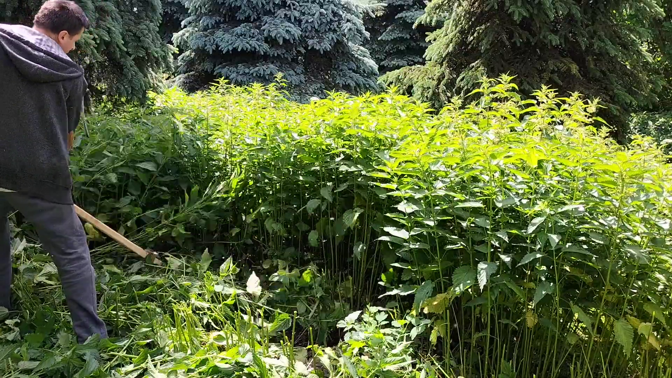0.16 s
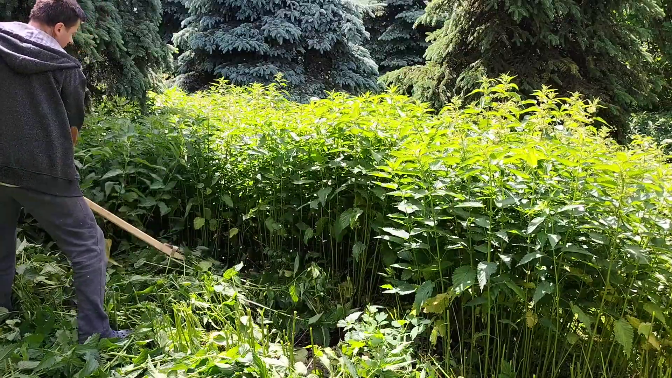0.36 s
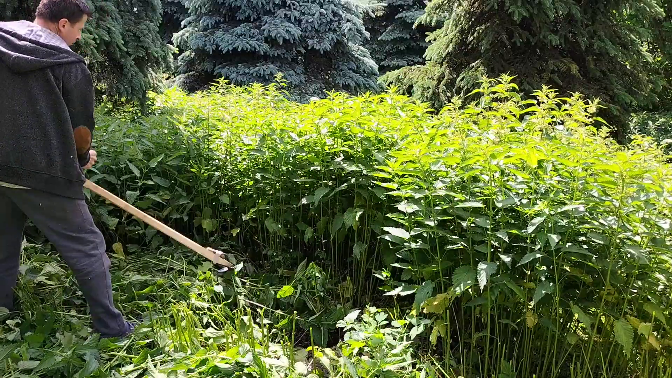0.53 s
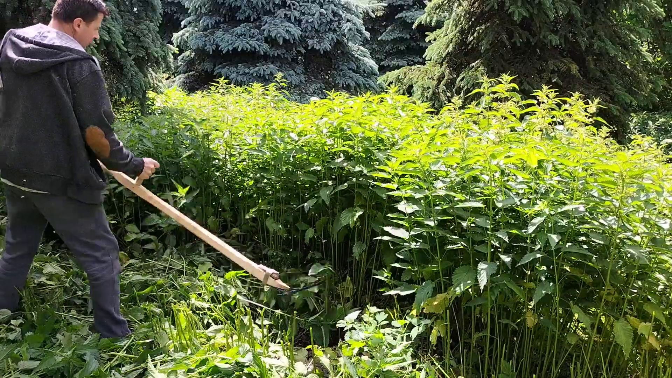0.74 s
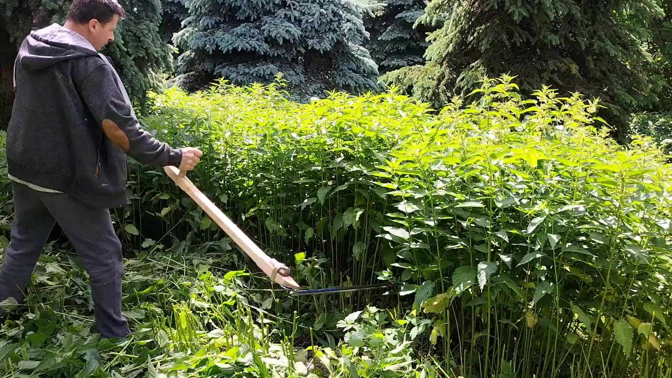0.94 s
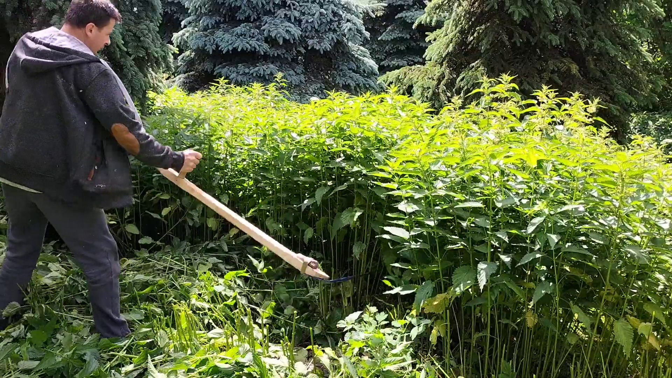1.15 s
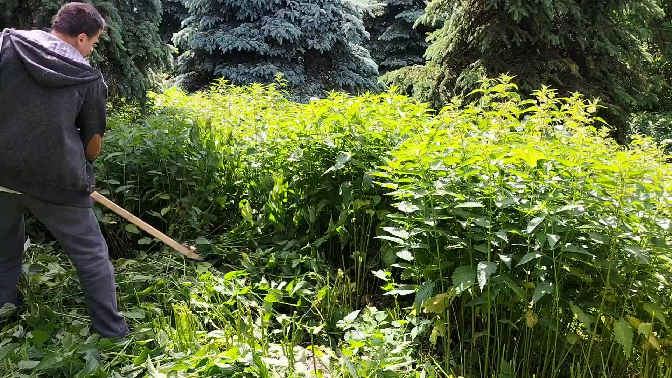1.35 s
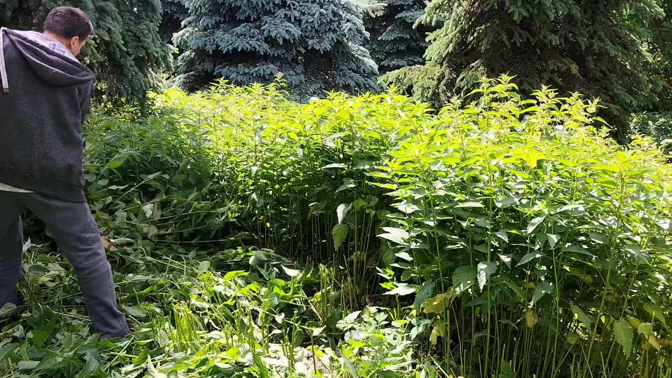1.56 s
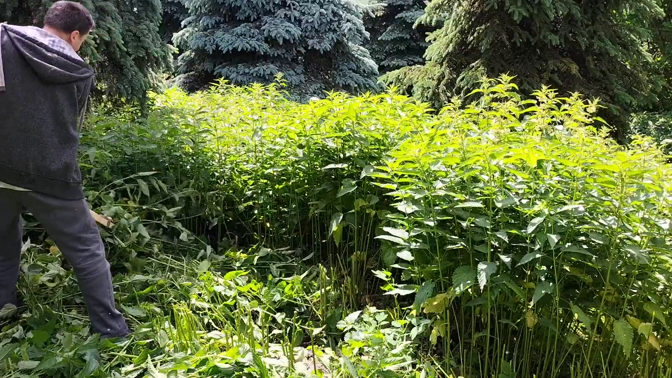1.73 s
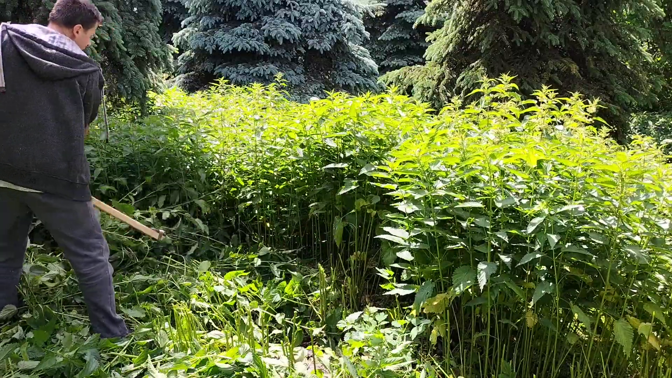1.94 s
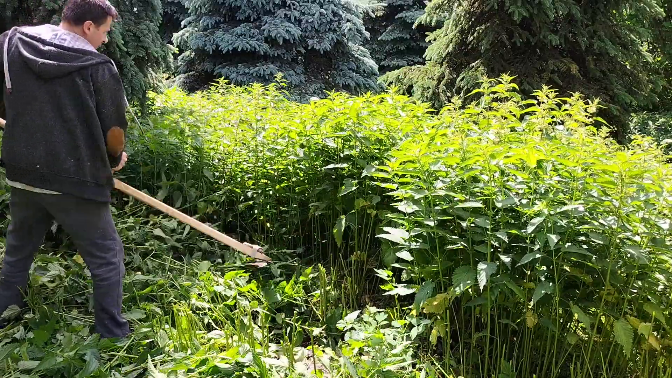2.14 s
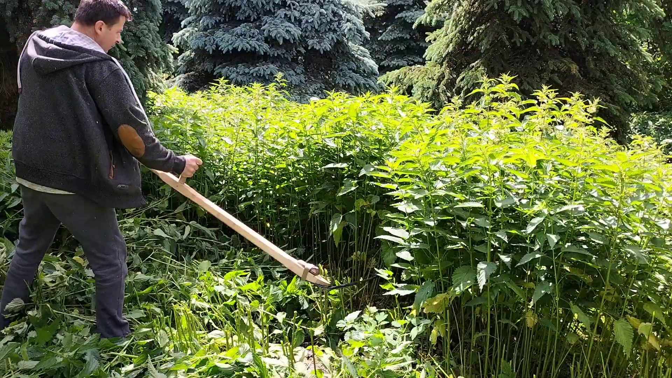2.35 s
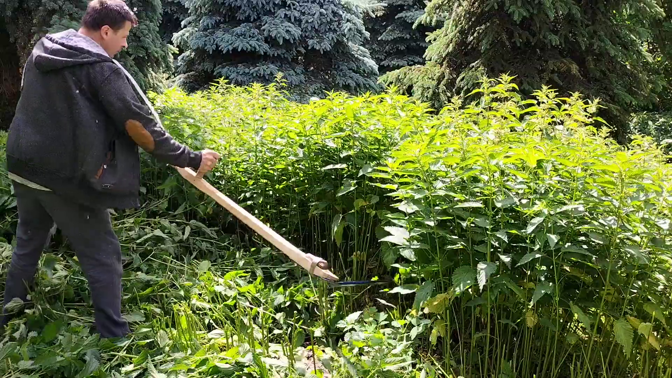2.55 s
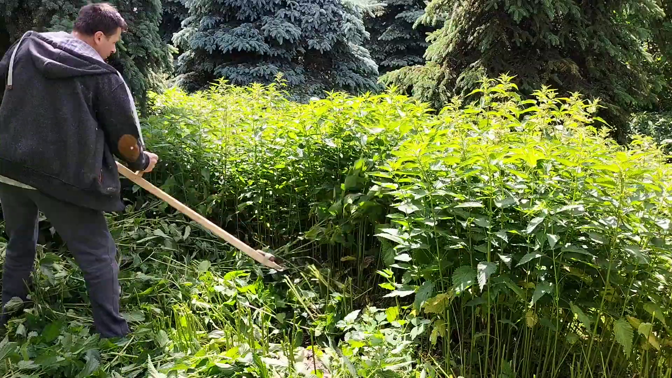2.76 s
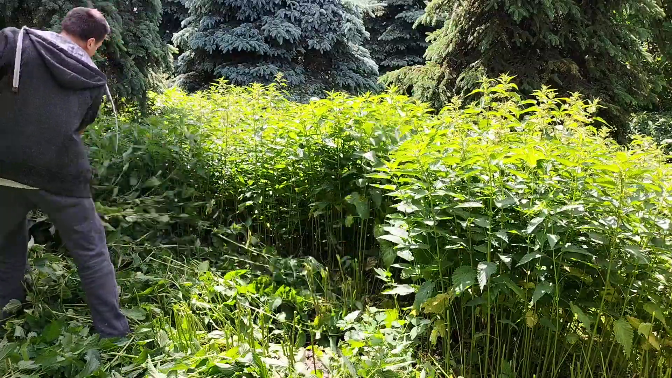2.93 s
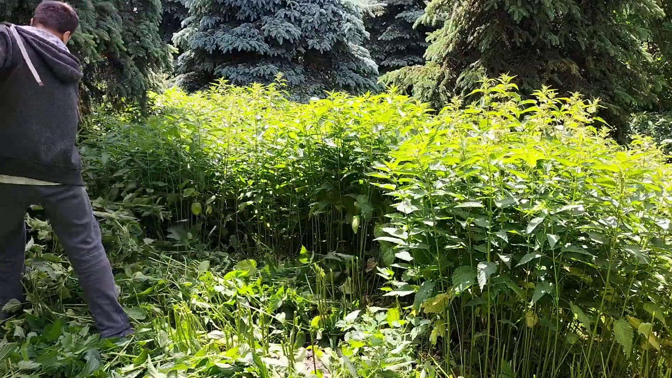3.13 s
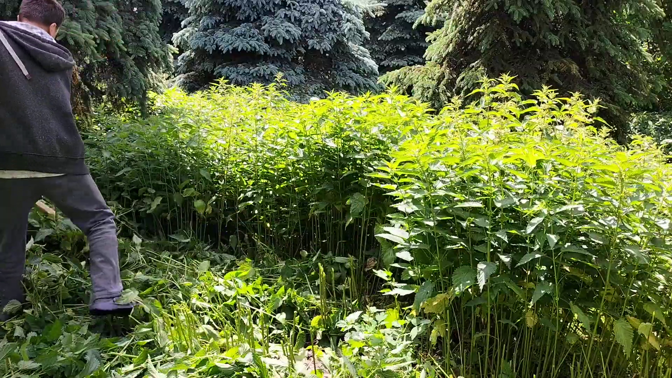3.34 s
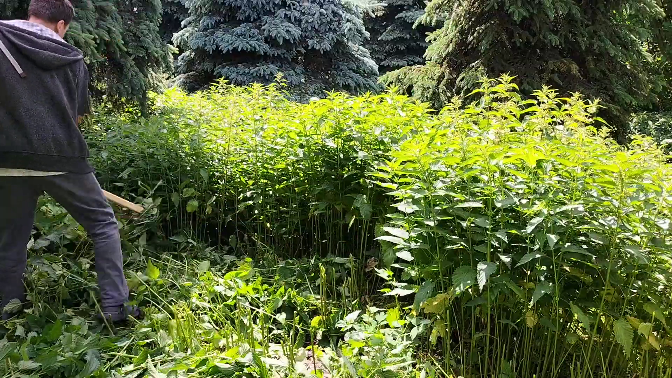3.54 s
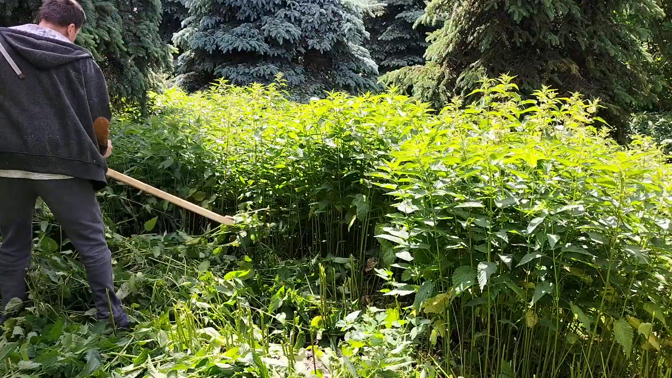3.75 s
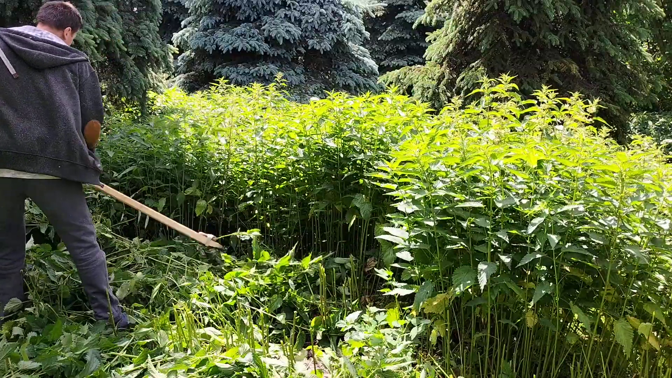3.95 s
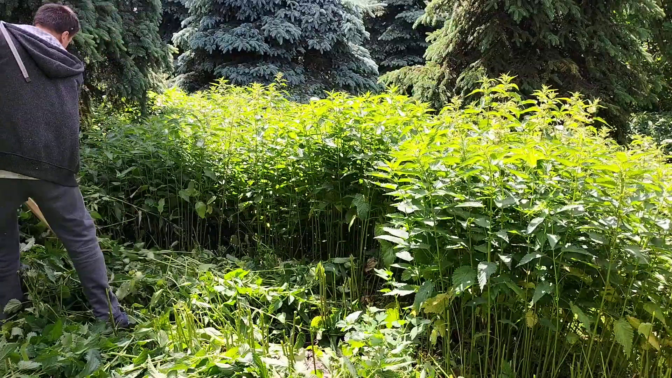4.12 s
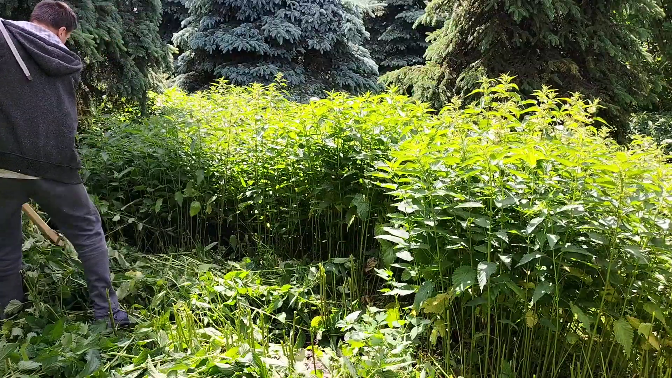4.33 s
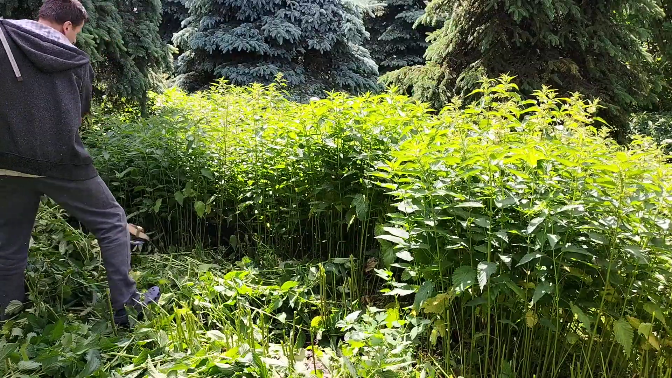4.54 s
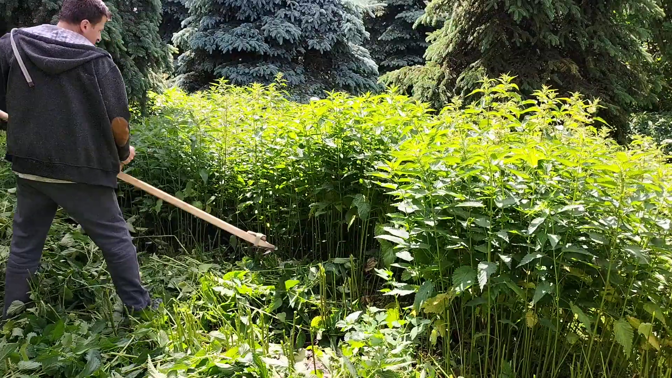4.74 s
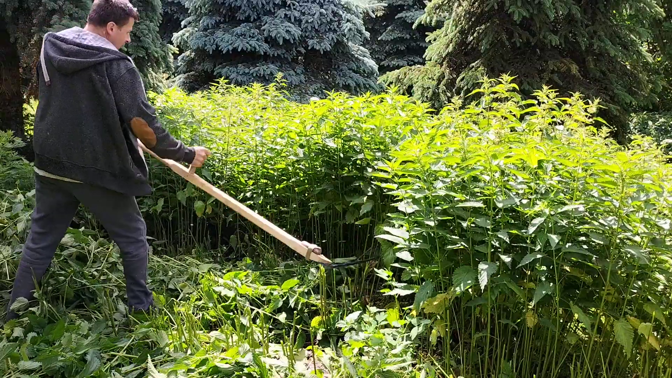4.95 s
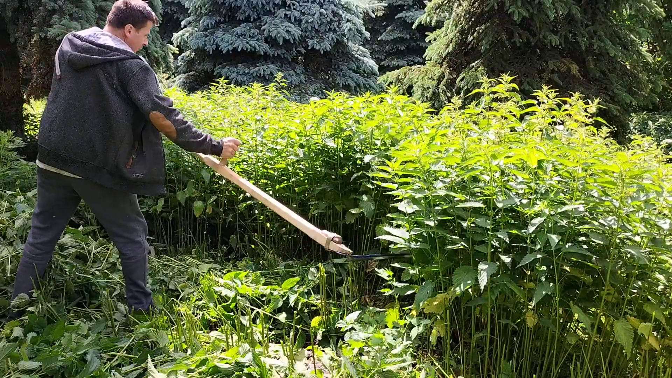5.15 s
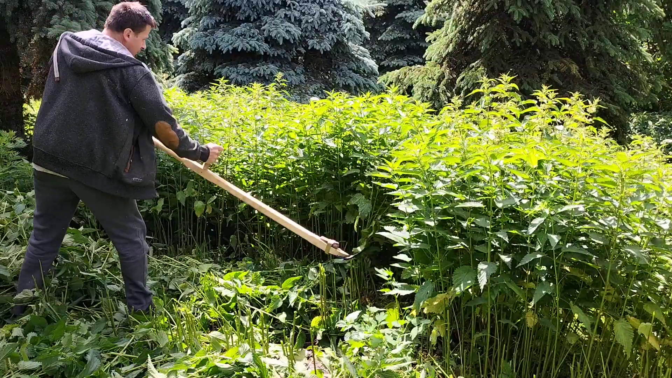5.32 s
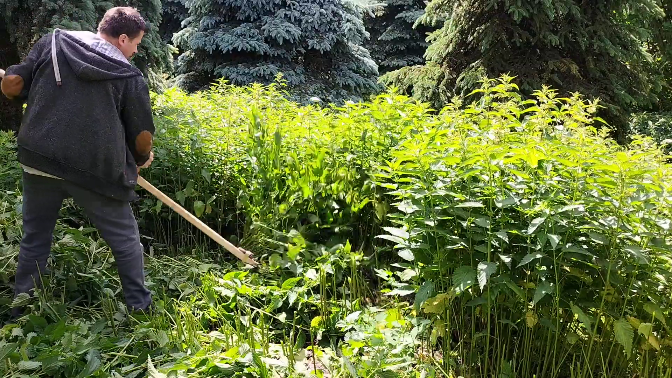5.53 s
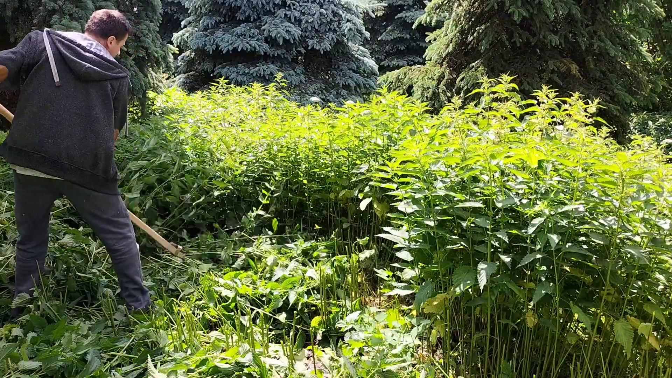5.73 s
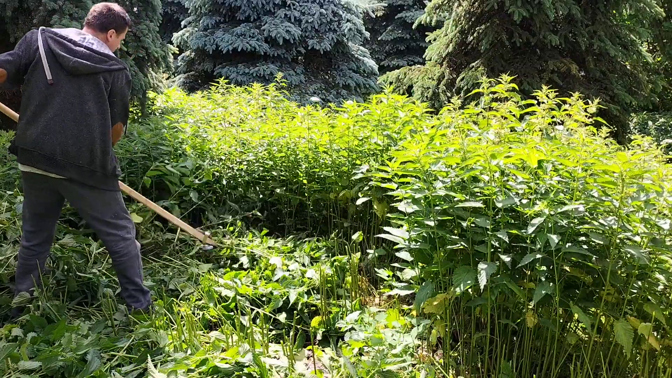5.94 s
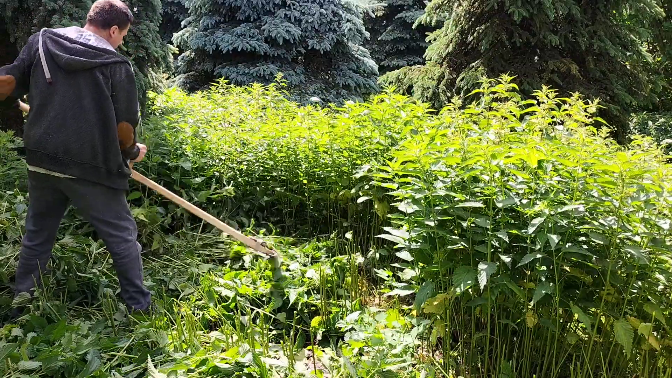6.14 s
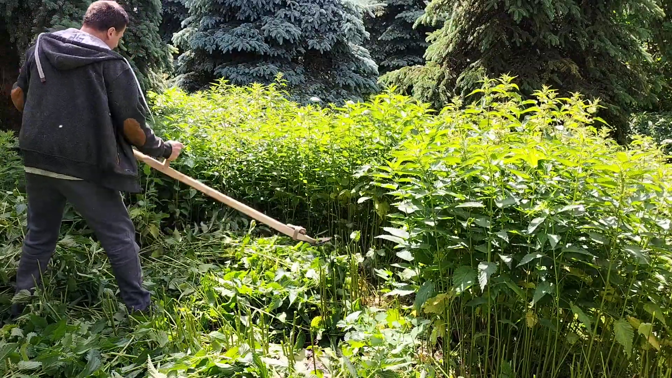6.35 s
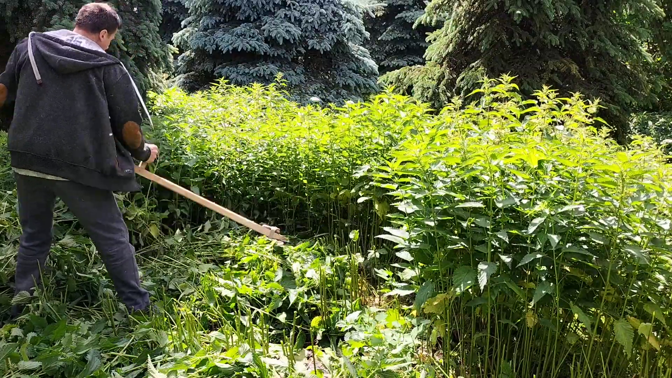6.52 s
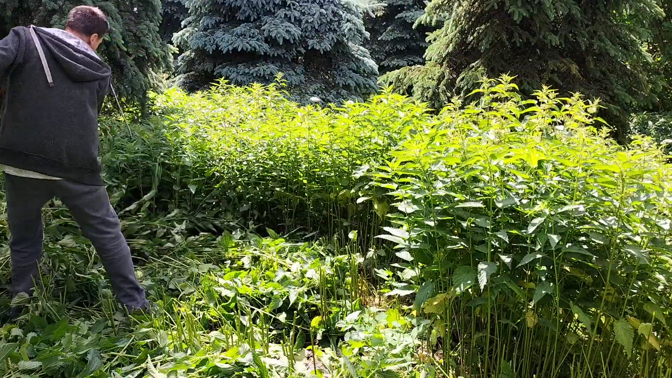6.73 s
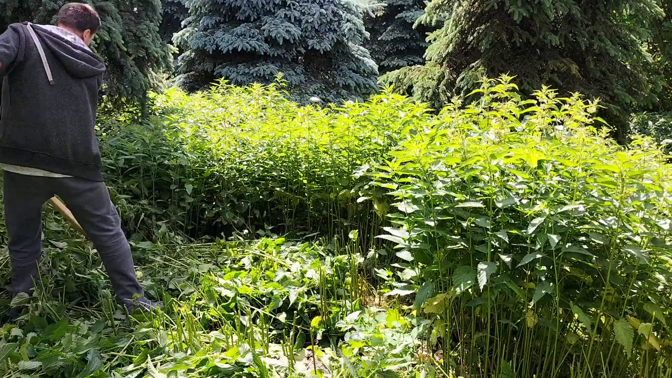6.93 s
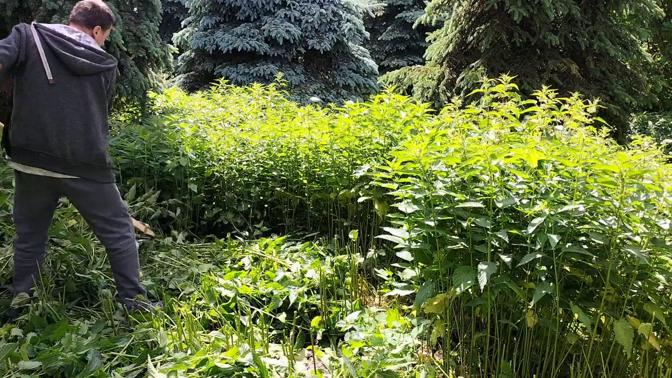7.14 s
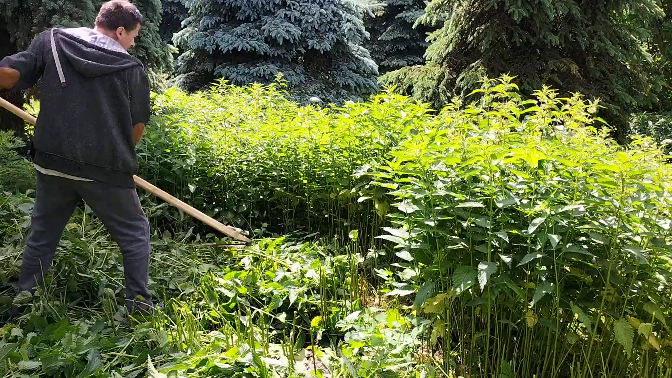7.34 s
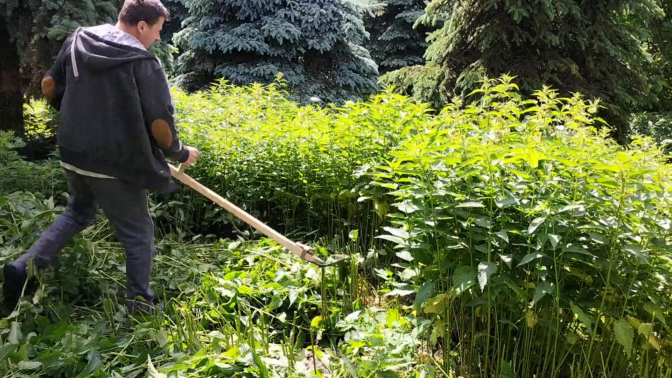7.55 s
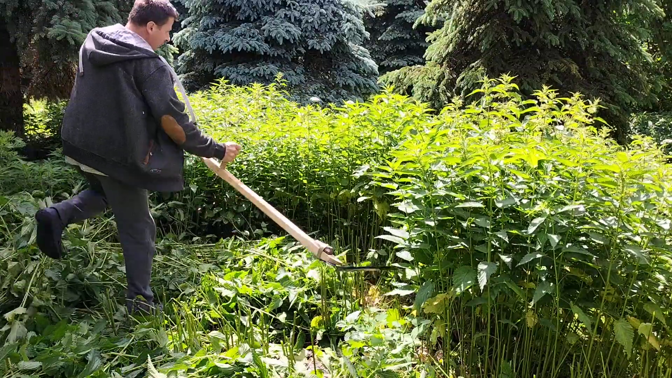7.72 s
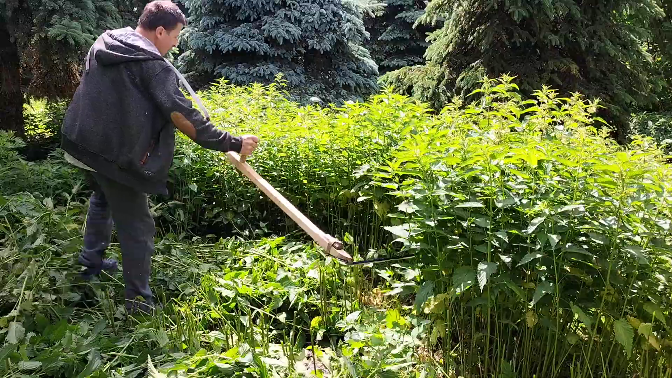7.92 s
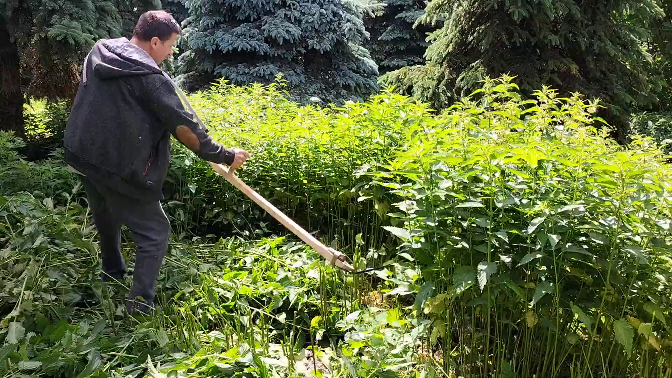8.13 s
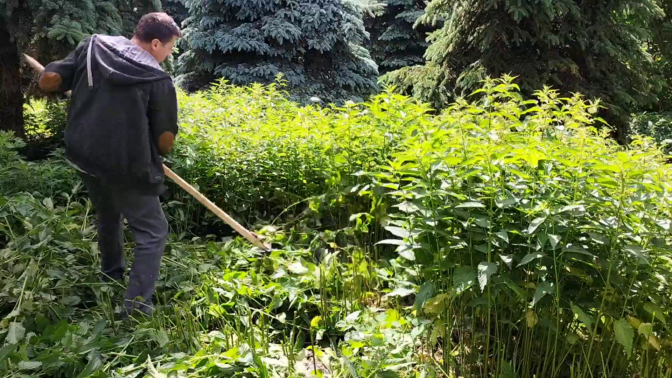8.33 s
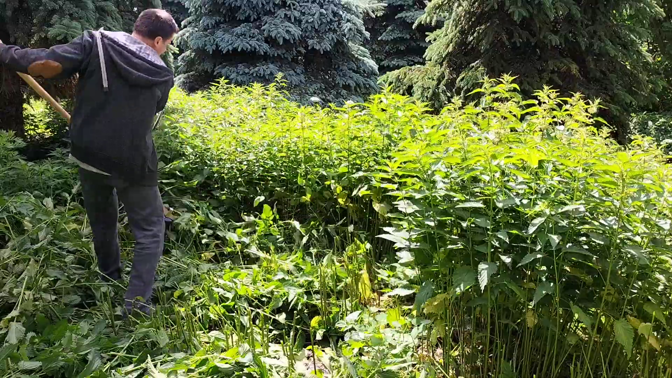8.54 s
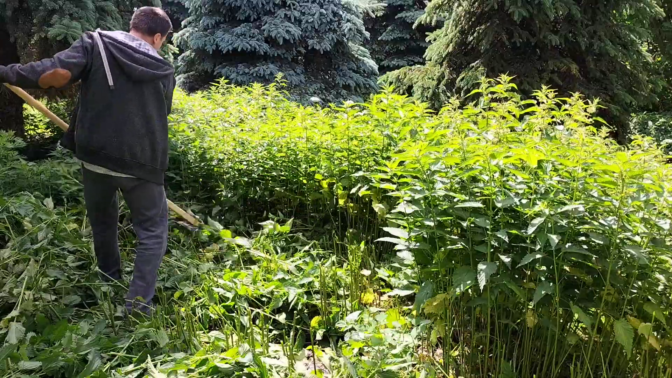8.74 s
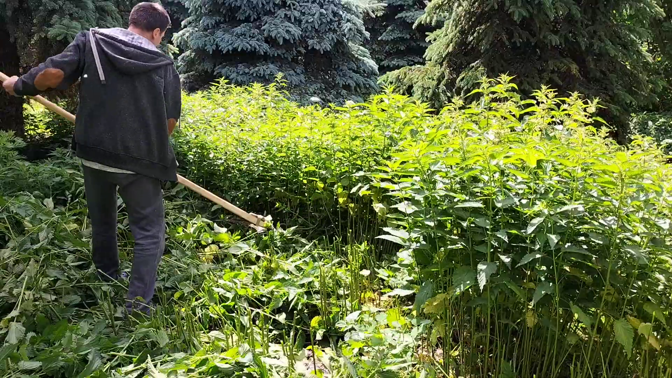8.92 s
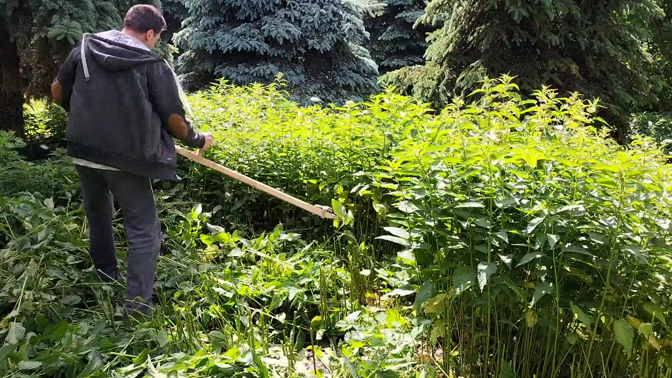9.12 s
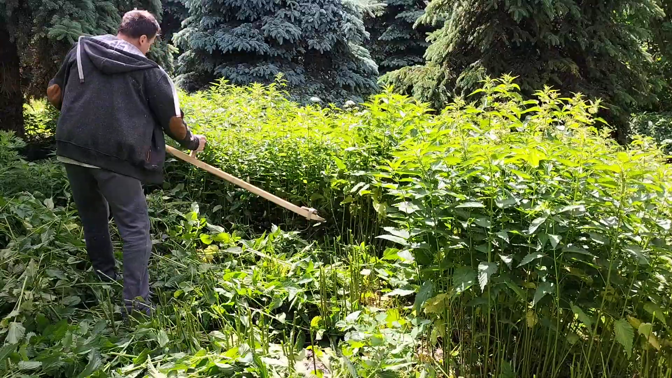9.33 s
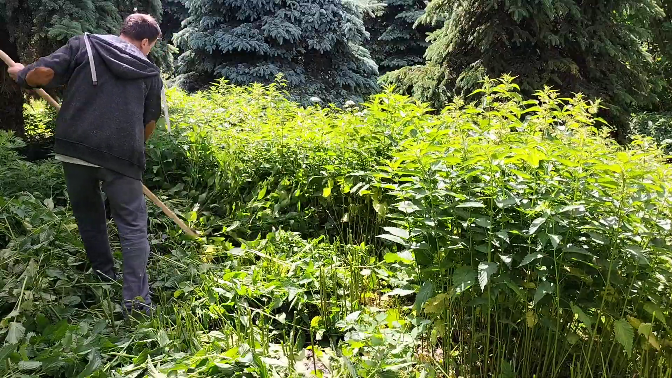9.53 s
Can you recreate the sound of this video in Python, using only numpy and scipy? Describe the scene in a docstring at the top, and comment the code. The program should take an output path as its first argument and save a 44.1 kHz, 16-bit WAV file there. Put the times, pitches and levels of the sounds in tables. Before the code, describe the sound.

Outdoors in a quiet garden among conifers, a hand scythe cuts thick green plants a few steps away. The first stroke is already under way; others follow about every 1.4 seconds, each a crisp tearing swish with cracking, hollow popping stems. Between them leaves rustle lightly and the blade knocks and scrapes on stubble. Birds chirp and trill above a faint low hush.

```python
"""One first hears leaves tearing: a scythe is already cutting tall nettles, a few steps away in a garden.
Eight strokes excite dense micro-fractures in leaves, fibres and stems, and thick stalks crack and pop.
Between cuts leaves are brushed, and the blade knocks, scrapes and slides on stubble as a modal resonator.
Birds whistle in glides and trills among the trees, with sparse echoes, over a hush of filtered noise."""
import sys
import numpy as np
from scipy import signal
from scipy.fft import rfft, irfft
from scipy.io import wavfile
from scipy.ndimage import uniform_filter1d

SR = 44100
rng = np.random.default_rng(int(sys.argv[2]) if len(sys.argv) > 2 else 0)


def put_to_file(sound):
    """Save the sound as 16-bit audio at rate SR, in the file named by the first command-line argument."""
    columns = np.atleast_2d(sound).T  # one column per channel
    safe = np.clip(columns, -1, 1)
    whole_steps = np.round(safe * 32767)
    wavfile.write(sys.argv[1], SR, whole_steps.astype(np.int16))


N = 426888
TIME = np.arange(N) / SR

# strokes of the scythe: (start [s], entry duration [s], cut duration [s], leaves [relative dB],
# tearing fibres [relative dB], crunch of stalks [relative dB], basic decay after the cut [dB/s],
# rustle just before [relative dB])
STROKES = [(-0.15, 0.28, 0.11, -39, -38.5, -46, 180, -72),
           (1.324, 0.16, 0.085, -38, -38.5, -47.5, 74, -73.5),
           (2.84, 0.048, 0.22, -40.5, -41, -51, 104.5, -67.5),
           (4.1, 0.054, 0.18, -45, -49.5, -57.5, 200, -69.5),
           (5.43, 0.097, 0.22, -41, -35.5, -47, 175.5, -67),
           (6.674, 0.14, 0.078, -43.5, -46.5, -57, 169, -88),
           (8.197, 0.18, 0.016, -36, -36.5, -43.5, 49, -61.5),
           (9.507, 0.077, 0.09, -40, -39.5, -53.5, 147, -75)]
# blade and legs brushing leaves between cuts: (middle [s], half length [s], relative level [dB])
BRUSHES = [(0.02, 0.031, -42), (0.44, 0.059, -60), (0.639, 0.1, -58.5), (0.9, 0.021, -50.5),
           (0.99, 0.055, -62.5), (2.105, .09, -63), (2.193, .012, -61), (2.313, 0.023, -54),
           (2.444, 0.028, -56), (3.45, 0.099, -64.5), (3.71, 0.11, -58.5), (4.597, 0.056, -65),
           (4.72, 0.032, -62.5), (4.815, 0.041, -60.5), (6.003, 0.097, -60.5), (6.318, 0.079, -57.5),
           (6.436, 0.02, -63.5), (7.462, 0.046, -54.5), (7.593, 0.034, -53), (7.714, 0.056, -54),
           (8.124, 0.034, -59.5), (8.968, 0.041, -53), (9.145, 0.0083, -59), (9.222, .013, -56.5)]
# thick stalks giving way: (time [s], crack [relative dB], hollow pop [relative dB], pop pitch [Hz],
# burst time scale [s])
STALK_SNAPS = [(0.058, -30, -35.5, 288, 0.028), (0.123, -33, -46, 340, 0.02),
               (0.164, -35, -41, 1170, 0.027), (0.23, -50, -43.5, 2920, 0.037),
               (1.374, -41, -48.5, 900, 0.015), (1.387, -35.5, -42, 1340, 0.045),
               (1.404, -44, -40, 280, 0.036), (1.463, -34.5, -40, 855, 0.047),
               (1.544, -38, -37.5, 1350, 0.018), (2.862, -36.5, -43, 500, 0.04),
               (2.892, -53, -39, 100, 0.045), (2.909, -38.5, -37.5, 955, 0.019),
               (3.022, -32, -48, 587, 0.014), (3.095, -49, -43, 1000, 0.02),
               (4.156, -44, -47.5, 2440, 0.025), (4.252, -42, -46, 1030, 0.038),
               (5.462, -53, -44, 2850, 0.0086), (5.514, -37.5, -41, 125, 0.051),
               (5.584, -33, -42.5, 630, 0.055), (5.746, -35, -47, 1390, 0.049),
               (6.666, -49, -56, 2620, 0.066), (8.278, -46, -42.5, 980, 0.043),
               (8.378, -34.5, -35.5, 220, 0.028), (8.388, -48, -35, 135, 0.028),
               (8.769, -44, -66.5, 2870, 0.0029), (9.653, -33, -38.5, 950, 0.01)]
# modes of the steel blade: (frequency [Hz], relative level [dB], free 60 dB decay time [s])
BLADE_MODES = [(516, 0, 0.45), (587, -1, 0.31), (677, -6, 0.88), (984, 8.5, 0.33), (1065, 2.5, 0.29),
               (1206, 3.5, 0.1), (1314, -5.5, 0.4), (1418, 2, 0.18), (1650, 4.5, 0.11), (1824, 5, 0.2),
               (2320, 6.5, 0.11), (2154, 0.5, 0.15), (2390, 0.5, 0.23), (2510, 8.5, 0.073), (2620, 5, 0.31),
               (2850, 4.5, 0.2), (3047, -3, 0.25), (1270, 2.5, 0.15), (3750, 3, 0.2), (4005, 1.5, 0.081),
               (4120, -2, 0.29), (5010, 1, 0.14), (5840, -3, 0.05)]
# blade knocking on stubble: (time [s], level [dB], centre of the modes struck [Hz],
# their spread [octaves], contact time scale [s])
KNOCKS = [(0.851, -70, 1485, 1, .02), (.885, -42, 1650, 0.24, 0.036), (2.43, -47.5, 2920, 0.51, 0.028),
          (2.444, -47.5, 1270, .5, 0.018), (2.59, -60, 1600, 0.23, 0.049), (2.814, -49, 1210, .093, .012),
          (3.755, -59, 1360, 0.4, 0.014), (4.099, -54, 1550, 0.88, 0.024), (5.037, -60, 2600, 0.38, 0.061),
          (5.087, -51.5, 1270, 0.19, .016), (7.69, -54, 1460, 0.42, 0.012),
          (7.725, -42.5, 1390, 0.32, 0.051), (7.735, -52, 4100, 0.31, 0.018),
          (9.273, -59.5, 1230, 0.14, 0.046)]
# blade dragging over stubble: (time [s], level [dB], centre frequency [Hz], contact time scale [s])
SCRAPES = [(0.974, -51.5, 715, 0.062), (1.304, -59, 710, 0.1), (3.85, -54, 2130, 0.038),
           (4.827, -57, 1550, 0.049), (7.267, -58.5, 2110, 0.11), (7.411, -58.5, 1730, 0.3),
           (7.516, -52, 2540, 0.021), (8.201, -45, 1930, 0.1), (9.041, -56.5, 1830, 0.28),
           (9.254, -56.5, 2310, 0.043)]
# light slides, each favouring the modes near one pitch:
# (time [s], level [dB], centre frequency [Hz], contact time scale [s])
SLIDES = [(1.016, -53, 1005, 0.19), (2.459, -54.5, 1040, 0.052), (5.135, -60, 1070, 0.037),
          (7.161, -63.5, 1455, 0.8), (7.84, -52.5, 1114, .055)]
# falling bird trills: (time [s], length [s], first pitch [Hz], last pitch [Hz], relative level [dB])
TRILLS = [(1.15, 0.13, 4300, 2690, -55), (1.828, 0.1, 4470, 3090, -60), (4.406, 0.098, 4420, 2750, -57.5),
          (5.129, 0.13, 5440, 2870, -61.5), (7.162, 0.11, 4130, 3216, -55.5),
          (7.722, 0.14, 4200, 2295, -54), (9.395, 0.1, 4290, 3200, -61)]
# single chirps: (time [s], length [s], first and last pitch before arching [Hz, Hz],
# relative level [dB], rasp [0-1])
CHIRPS = [(0.635, 0.064, 3900, 3900, -49, 0.75), (1.895, 0.045, 3500, 3410, -51, 0.12),
          (1.93, 0.02, 3130, 2900, -56, 0.3), (1.156, 0.042, 4960, 4600, -65, .1),
          (1.936, .035, 4560, 4520, -60, .2), (2.651, 0.051, 5640, 5780, -64, 0.1),
          (2.652, 0.037, 4900, 4850, -62, 0), (2.672, 0.043, 3960, 3880, -64, 0),
          (3.88, 0.052, 3900, 3660, -58.5, .8), (5.32, .028, 4740, 4780, -66, 0.1),
          (5.328, 0.039, 3920, 3880, -56.5, .05), (5.974, .017, 2600, 3970, -51, .8),
          (5.981, 0.03, 4130, 3770, -51.5, 0.4), (6.368, .04, 4750, 3500, -64, .1),
          (7.785, 0.04, 3960, 3600, -53, 0), (8.949, 0.058, 3220, 3240, -52, 0.31),
          (9.467, .04, 3730, 3900, -55, 0.23)]
# spectral envelope of torn leaves and cracks: (frequency [Hz], relative level [dB])
LEAF_SPECTRUM = [(60, -37), (250, -23), (700, -10), (1300, -7), (2000, -8), (2700, -3.5), (3900, -0.5),
                 (4700, -4), (6000, -0.5), (7200, -1.5), (9500, -25.5), (11000, -23), (12000, -17),
                 (15000, -15)]
# spectral envelope of tearing fibres: (frequency [Hz], relative level [dB])
FIBRE_SPECTRUM = [(80, -30), (350, -18.5), (700, 3.5), (1050, 3), (1500, -0.5), (2000, -4.5), (2800, -9),
                  (4500, -1), (9000, -12)]
# spectral envelope of crunching stalks: (frequency [Hz], relative level [dB])
STALK_SPECTRUM = [(30, -60), (70, -10.5), (125, -1), (200, 3.5), (320, 4), (500, -2.5), (900, 0.5),
                  (2000, -6.5), (9000, -49)]
# spectral envelope of hollow pops: (frequency [Hz], relative level [dB])
POP_SPECTRUM = [(30, -37), (80, -38), (150, -7.5), (3000, -3), (9000, -34)]
# spectral envelope of the garden's hush: (frequency [Hz], relative level [dB])
GARDEN_SPECTRUM = [(25, -12), (70, -8), (200, 2.5), (450, -1.5), (1000, 0), (2000, -12.5), (4000, -29),
                   (7000, -53), (10000, -62), (15000, -52)]
# mean level of the hush, which eases later on: (time [s], level [dB])
GARDEN_LEVEL = [(0, -67.5), (5.2, -67.5), (6.6, -70.5), (9.68, -71)]

LEAF_COLUMN, TEAR_COLUMN, CRUNCH_COLUMN = 3, 4, 5  # columns of STROKES
# the blade bites, sinks into the clump and slows a little in the cut; levels before steepening
ENTRY_DB, BITE_DB_PER_S, SAG_DB = -20.5, 900, -0.5
TEAR_STEEP, CRUNCH_STEEP = 1.15, 1.12  # fibres and stalks come and go more steeply than leaves
STOP_DB_PER_S = 44  # added to their basic decay, before steepening
FALLEN_DB, BACKSWING_DB = -69, -68.5  # relative rustle after a cut and late in the backswing
LULL_S = 0.2  # lull at the turn
# after a knock the whole blade flexes in its low modes; FLEX_DB is relative to the knock
FLEX_LAG_S, FLEX_DB, FLEX_HZ, FLEX_OCTAVES, FLEX_S = 0.013, -12, 650, 0.3, 0.062
SCRAPE_OCTAVES, SLIDE_OCTAVES = 0.38, 0.024
# chatter and rasp against free ringing, per second and octave of contact; and their upper limit
KNOCK_GRIT, SCRAPE_GRIT, MAX_DRAG = 34, 39, 1.3
TRILL_SYLLABLES = 3
TRILL_DIP, TRILL_RASP = 0.14, 0.5  # depth of the level modulation, and rasp [0-1]
CHIRP_ARCH = 0.025  # share by which the pitch is lowered at both ends
EDGE_HZ = 15600


def leaves():
    """Micro-fracture noise: leaves tear in clumps, their fracture rate rising as the blade cuts."""
    leaf_db, cutting = leaf_level()
    grains = crackle(3000 + 4500 * cutting, spread_db=-1.0, ring_s=0.0049, tuned=0.4, count=48)
    twangs = crackle(170, spread_db=2.7, ring_s=0.0043, tuned=1.6, low_hz=1000, high_hz=4496, count=40)
    twang_db = -11.5 + 1.2 * cutting
    tearing = grains + amp(twang_db) * twangs
    clumped_db = leaf_db + 0.5 + 0.81 * wander(N, hz=51.7)
    return colour(tearing * amp(clumped_db), LEAF_SPECTRUM)


def leaf_level():
    """Power addition of cutting and rustling: gives leaf level [dB] and cutting strength (0-2)."""
    leaf_db = 20 * np.log10(np.hypot(stroke_level(LEAF_COLUMN), rustle_level()))
    cutting = 1 / (0.5 + np.exp(-(leaf_db + 50) / 4))
    return leaf_db, cutting


def stroke_level(column, steep=1, stop_db_per_s=0):
    """Exponential growth and decay: each stroke bites, swells, sags through the cut and dies away."""
    power = np.zeros(N)
    for row in STROKES:
        start, entry, cut = row[:3]
        decay_db_per_s = row[6] + stop_db_per_s
        shape_db = np.interp(TIME - start, [0, entry, entry + cut], [ENTRY_DB, 0, SAG_DB])
        before = np.maximum(start - TIME, 0)
        after = np.maximum(TIME - start - entry - cut, 0)
        shape_db = shape_db - BITE_DB_PER_S * before - decay_db_per_s * after
        power += amp(row[column] + steep * shape_db) ** 2
    return np.sqrt(power)


def rustle_level():
    """Power addition of settling plants and brushed leaves, with a lull at each turn."""
    points = []
    for start, entry, cut, *_, lull_db in STROKES:
        points += [(start - LULL_S, BACKSWING_DB), (start - LULL_S / 4, lull_db)]
        points += [(start, lull_db), (start + entry + cut, FALLEN_DB)]
    settling = amp(np.interp(TIME, *np.transpose(points)))
    brushed = sum((amp(db) * np.exp(-((TIME - s) / half) ** 2 / 2)) ** 2 for s, half, db in BRUSHES)
    return np.sqrt(settling ** 2 + brushed)


def stalks():
    """Fracture and resonance: fibres part in quick bunches and severed hollow stems ring briefly."""
    tearing = stroke_level(TEAR_COLUMN, TEAR_STEEP, STOP_DB_PER_S)
    crunching = stroke_level(CRUNCH_COLUMN, CRUNCH_STEEP, STOP_DB_PER_S)
    fibres = crackle(1400, spread_db=3.5, ring_s=0.0049, tuned=0.67, low_hz=482, high_hz=4200)
    stems = crackle(700, spread_db=3.0, ring_s=0.019, tuned=0.27, low_hz=105.4, high_hz=900, count=16)
    fibres = fibres * tearing * amp(-5.5 + 3.4 * wander(N, hz=69))
    stems = stems * crunching * amp(2.0 * wander(N, hz=49))
    return colour(fibres, FIBRE_SPECTRUM) * amp(-6) + colour(stems, STALK_SPECTRUM) * amp(-5)


def snaps():
    """Forced resonance: a splitting stalk cracks while its hollow stem pops at its own pitch."""
    cracks, pops = np.zeros(N), np.zeros(N)
    for s, crack_db, pop_db, hz, length in STALK_SNAPS:
        u = np.arange(SR // 8) / SR / length
        burst = (1 - np.exp(-u / 0.15)) * np.exp(-u ** 2)
        push = rng.standard_normal(len(u))
        stem = unit(ring(push, hz, t60=0.017)) + 0.44 * unit(ring(push, hz, t60=0.0026))
        add(cracks, s, amp(crack_db) * burst)
        add(pops, s, amp(pop_db) * burst * unit(stem))
    cracks = cracks * crackle(3500, spread_db=3.5, ring_s=0.0091, tuned=0.12)
    return colour(cracks, LEAF_SPECTRUM) + amp(-5.5) * colour(pops, POP_SPECTRUM)


def singing(crunch):
    """Damped modal response: the cut stirs the blade's modes, which the plants damp quickly."""
    return amp(-30.5) * sum(amp(db) * ring(crunch, hz, t60=0.07) for hz, db, _ in BLADE_MODES)


def clinks():
    """Contact excitation of modes: the blade knocks and flexes, drags over stubble and slides."""
    out = np.zeros(N)
    for s, db, centre_hz, octaves, length in KNOCKS:
        add(out, s, clink(db, centre_hz, octaves, length, KNOCK_GRIT))
        flex = clink(db + FLEX_DB, FLEX_HZ, FLEX_OCTAVES, FLEX_S, SCRAPE_GRIT)
        add(out, s + FLEX_LAG_S, flex)
    for s, db, centre_hz, length in SCRAPES:
        add(out, s, clink(db, centre_hz, SCRAPE_OCTAVES, length, SCRAPE_GRIT))
    for s, db, hz, length in SLIDES:
        add(out, s, clink(db, hz, SLIDE_OCTAVES, length, SCRAPE_GRIT))
    return signal.sosfilt(signal.butter(4, 330, "highpass", fs=SR, output="sos"), out)


def clink(db, centre_hz, octaves, length, grit):
    """Modal superposition: the place of contact with the stubble picks which blade modes sound."""
    t = np.arange(SR // 2) / SR
    push = rng.standard_normal(len(t)) * np.exp(-(t / length) ** 2) * amp(2.8 * wander(len(t), hz=55.3))
    steel, chatter = np.zeros(len(t)), np.zeros(len(t))  # free ringing, and damped while touching
    for hz, mode_db, t60 in BLADE_MODES:
        share = amp(mode_db) / (1 + (np.log2(hz / centre_hz) / octaves) ** 2)
        bent_hz = hz * (1 + 0.0044 * rng.standard_normal())  # pressure on the blade shifts its modes
        decay_time = np.hypot(t, 0.93 * length) - 0.78 * length  # held while scraped, then free
        swell = np.exp(-np.log(1000) * decay_time / t60)
        steel += share * swell * np.sin(2 * np.pi * (bent_hz * t + rng.random()))
        chatter += share * ring(push, hz, t60 / 6)
    rasp_t60 = 0.87 / (centre_hz * octaves)  # the stubble itself rasps in one wide band
    rasp = ring(ring(push, centre_hz, rasp_t60), centre_hz, rasp_t60)
    drag = min(grit * octaves * length, MAX_DRAG)  # a long, broad scrape is mostly chatter and rasp
    onset = 1 - np.exp(-t / 0.0018)
    sound = unit(steel * onset) + drag * (unit(chatter) + 1.2 * drag * unit(rasp))
    loudest_rms = np.sqrt(uniform_filter1d(sound ** 2, size=900).max())
    return amp(db) * sound / loudest_rms


def birds():
    """Frequency glides: trills fall in pitch over a few syllables, single chirps follow a small arch."""
    out = np.zeros(N)
    for s, length, first_hz, last_hz, db in TRILLS:
        u = np.linspace(0, 1, min(int(length * SR), SR // 4))
        syllables = 1 - TRILL_DIP * np.cos(2 * np.pi * TRILL_SYLLABLES * u)
        falling_hz = first_hz + (last_hz - first_hz) * u
        add(out, s, amp(db) * syllables * whistle(falling_hz, TRILL_RASP))
    for s, length, first_hz, last_hz, db, rasp in CHIRPS:
        arch = np.linspace(-1, 1, min(int(length * SR), SR // 4)) ** 2
        arched_hz = np.linspace(first_hz, last_hz, len(arch)) * (1 - CHIRP_ARCH * arch)
        add(out, s, amp(db) * whistle(arched_hz, rasp))
    return out


def whistle(hz, rasp):
    """Frequency and amplitude modulation: fast flutter roughens a tone that follows a pitch curve."""
    n = len(hz)
    flutter = wander(SR // 4, hz=425)[:n]
    throb = np.tanh(wander(SR // 4, hz=90))[:n]
    phase = 2 * np.pi * np.cumsum(hz * (1 + 0.08 * rasp * flutter)) / SR
    note = np.sin(phase) * (1 + rasp * throb)
    return unit(note) * signal.windows.tukey(n, 0.4)


def trees(x, wet_db, t60):
    """Multiple scattering: the surrounding firs return sparse, decaying echoes."""
    t = np.arange(SR // 2) / SR
    sparse = rng.standard_normal(len(t)) * (rng.random(len(t)) < 0.05)
    taps = sparse * amp(-60 * t / t60) * (t > 0.004)
    return x + amp(wet_db) * signal.oaconvolve(x, taps / np.linalg.norm(taps))[:N]


def air():
    """Filtered noise with slow amplitude modulation: the quiet, nearly steady hush of the garden."""
    sway_db = 0.8 * wander(N, hz=2)
    hush_db = np.interp(TIME, *np.transpose(GARDEN_LEVEL)) + sway_db
    return amp(hush_db) * colour(rng.standard_normal(N), GARDEN_SPECTRUM)


def crackle(per_s, spread_db, ring_s, tuned, low_hz=700, high_hz=7500, count=32):
    """Random impulses and resonance: uneven tiny fractures click, each ringing one of many fibres."""
    size = amp(spread_db * np.minimum(rng.exponential(1, N), 4)) * rng.choice([-1, 1], N)
    clicks = size * (rng.random(N) < per_s / SR) / np.sqrt(per_s)
    fibre, rings = rng.integers(0, count, N), np.zeros(N)
    r = np.exp(-1 / (ring_s * SR))  # ring_s is the 1/e decay time
    for k, hz in enumerate(np.geomspace(low_hz, high_hz, count)):
        c = r * np.cos(2 * np.pi * hz / SR)
        struck = clicks * (fibre == k) + 1e-18
        rings += np.sqrt(hz) * signal.lfilter([1, -c], [1, -2 * c, r * r], struck)
    return unit(unit(clicks) + tuned * unit(rings))


def ring(push, hz, t60):
    """Damped oscillator: one mode driven by a force, decaying 60 dB in t60 seconds."""
    r = np.exp(-np.log(1000) / (t60 * SR))
    return signal.lfilter([np.sqrt(1 - r * r)], [1, -r * np.exp(2j * np.pi * hz / SR)], push).real


def colour(x, points, size=2048):
    """Minimum-phase filtering: a causal, unit-energy response with the given spectral shape."""
    hz, db = np.transpose(points)
    grid_hz = abs(np.fft.fftfreq(size, 1 / SR)) + 1
    log_gain = np.log(amp(np.interp(np.log(grid_hz), np.log(hz), db)))
    taps = np.fft.ifft(np.exp(np.conj(signal.hilbert(log_gain)))).real
    return signal.oaconvolve(x, taps / np.linalg.norm(taps))[:len(x)]


def wander(n, hz):
    """Low-pass noise: smooth random motion of rms 1, mostly below hz."""
    f = np.fft.rfftfreq(n, 1 / SR)
    return unit(irfft(rfft(rng.standard_normal(n)) / (1 + (f / hz) ** 4), n))


def amp(db):
    """Logarithmic level: converts decibels to amplitude gain."""
    return 10 ** (np.asarray(db) / 20)


def unit(x):
    """Power normalisation: scales to rms 1."""
    return x / np.sqrt(np.mean(x ** 2) + 1e-20)


def add(mix, s, sound):
    """Linear superposition: mixes a sound in at time s [s]."""
    part = mix[max(round(s * SR), 0):][:len(sound)]
    part += sound[:len(part)]


def scene():
    """Superposition of sources: mowing and birds, each with tree echoes, over the garden's air."""
    crunch = leaves() + stalks() + snaps()
    mowing = trees(crunch + singing(crunch) + clinks(), wet_db=-16.0, t60=0.52)
    birdsong = trees(birds(), wet_db=-3.5, t60=0.19)
    return (mowing + birdsong + air())[None]


def record(dry):
    """Band limitation: a linear-phase low-pass removes the highest treble."""
    taps = signal.firwin(511, EDGE_HZ, window=("kaiser", 9), fs=SR)
    return signal.oaconvolve(dry, taps[None], "same")


dry = scene()
out = record(dry)
put_to_file(out)
```